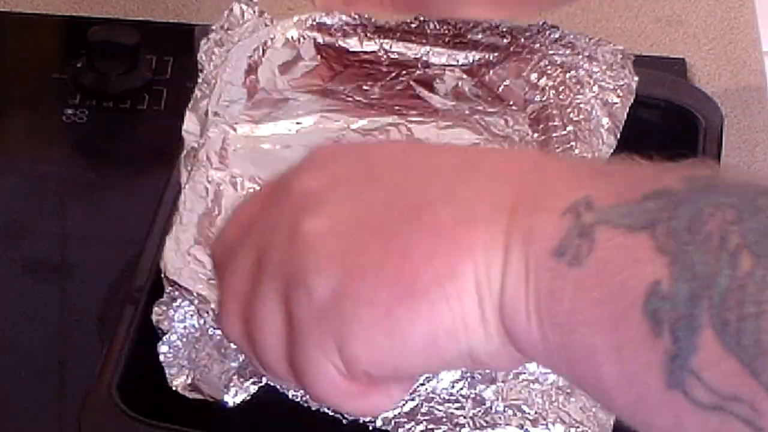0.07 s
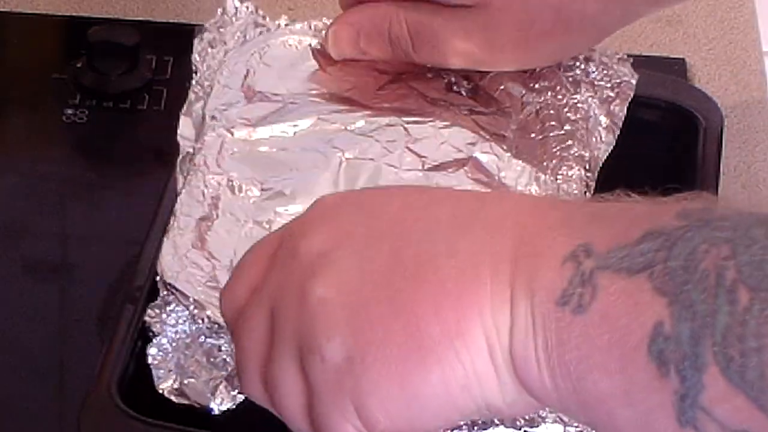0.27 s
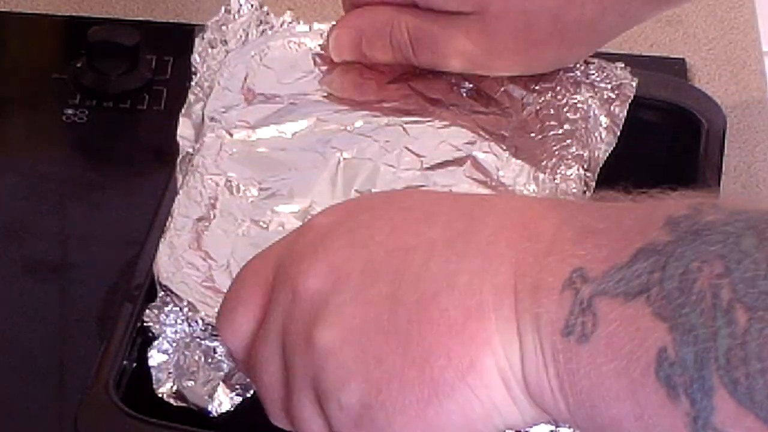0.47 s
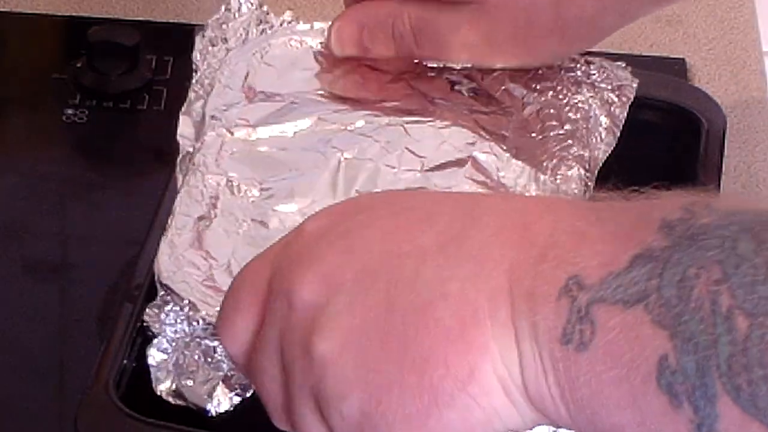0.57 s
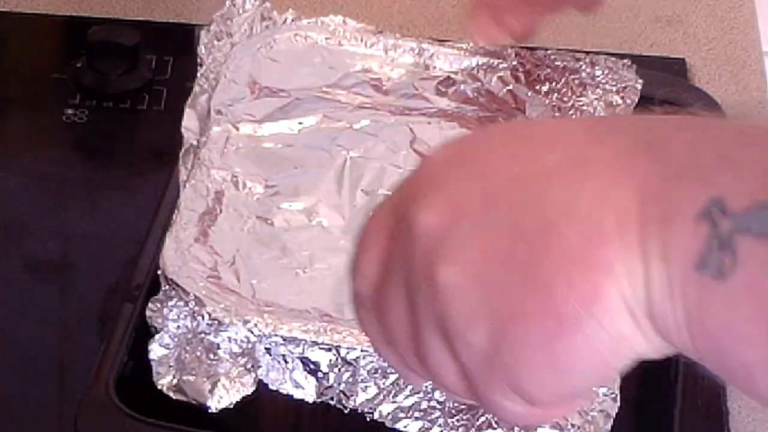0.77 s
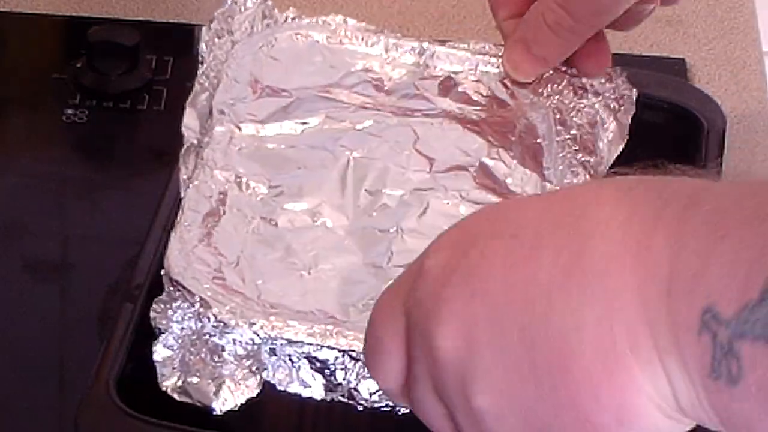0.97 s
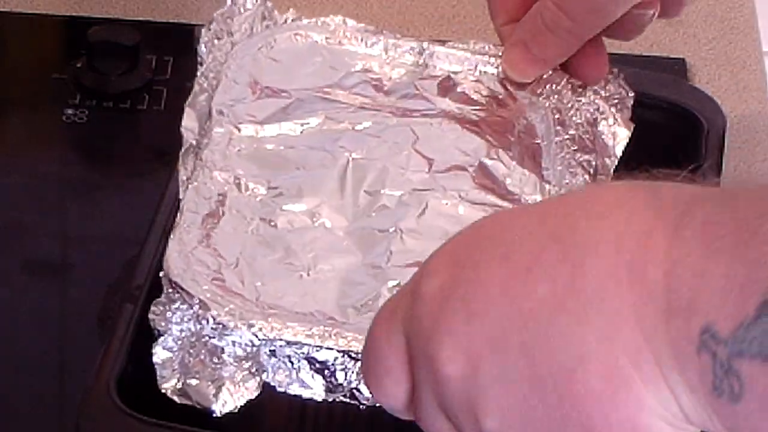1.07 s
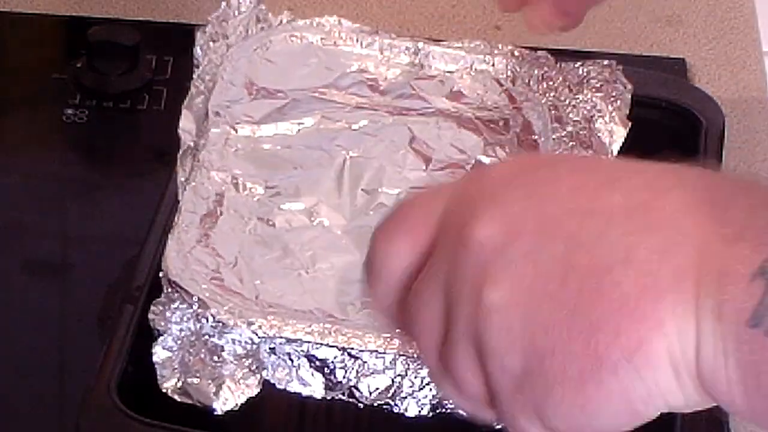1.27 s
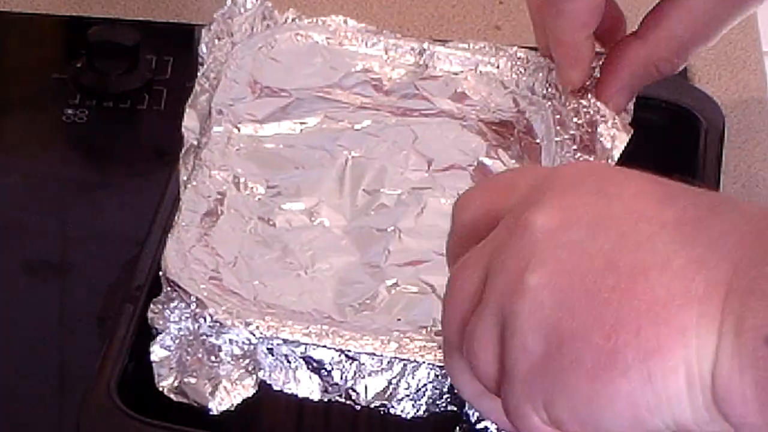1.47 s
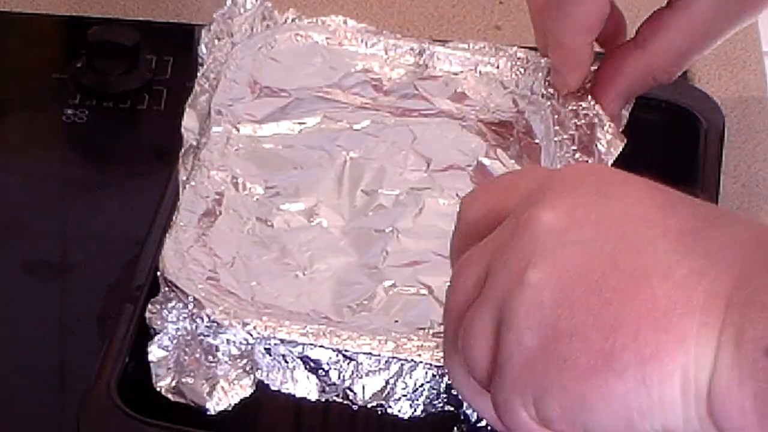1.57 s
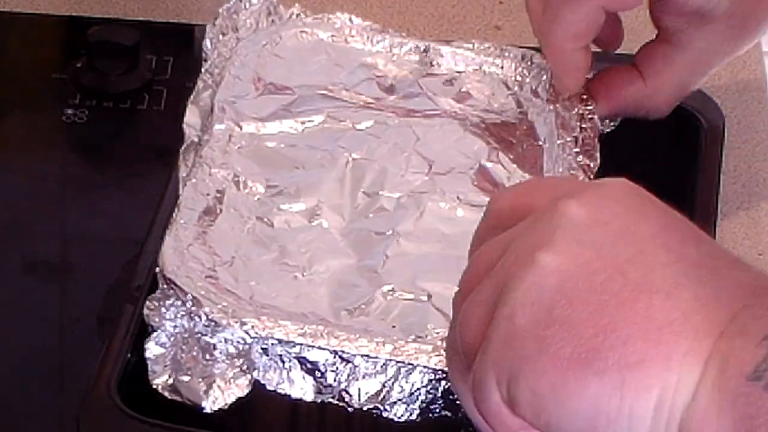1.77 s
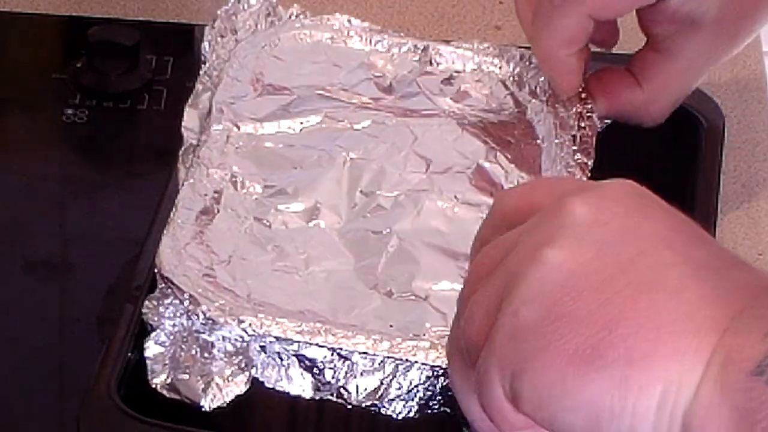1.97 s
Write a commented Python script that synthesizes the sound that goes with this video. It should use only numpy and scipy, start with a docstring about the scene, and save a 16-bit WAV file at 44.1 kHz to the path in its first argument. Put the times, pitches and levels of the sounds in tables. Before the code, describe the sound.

Bright, close crackling of aluminium foil comes in uneven bursts as hands mould it around a roasting tin, which knocks softly now and then. The sharpest crackle comes near the end, in a small, faintly humming kitchen.

```python
"""In a small kitchen with hard walls, hands press aluminium foil over a roasting tin.
Creases buckle in clusters of sharp clicks over a finer crackle, and firm presses knock the tin so
that it rings. The room echoes briefly over a low hum. A nearby microphone with a bright peak
picks it all up."""
import sys
import numpy as np
from scipy import signal
from scipy.fft import rfft, irfft, next_fast_len
from scipy.io import wavfile
from scipy.ndimage import map_coordinates

SR = 44100
rng = np.random.default_rng(int(sys.argv[2]) if len(sys.argv) > 2 else 0)


def pcm_store(signal):
    """Save signal as 16-bit PCM."""
    levels = np.round(np.clip(np.atleast_2d(signal), -1, 1) * 32767)
    wavfile.write(sys.argv[1], SR, levels.astype(np.int16).T)


N = 88993

# The tone of the kitchen's hum. Each row: frequency in Hz, relative level in dB.
HUM_TONE = [(20, -6.5), (60, -2), (100, 0.5), (175, -3), (268, 1.5), (365, 2), (450, -4), (520, 0.5),
            (900, -10), (1800, -17), (4800, -26.5), (9600, -38), (13500, -38), (15500, -40)]
# The room's echo. Each row: frequency in Hz, seconds to fade by 60 dB.
ROOM_FADE = [(500, .33), (2000, .32), (5500, .24), (10000, .22), (14000, .24)]
# The tin's own notes. Each row: pitch in Hz, relative level in dB, seconds to fade by 60 dB.
TIN_NOTES = [(390, -1.5, 0.068), (529.4, 0.5, 0.078), (686, 0, 0.046), (820, -1.5, 0.098),
             (1030, -8, 0.044), (1130, -3.5, 0.046), (1253, 0, 0.1), (1572, -7, 0.051), (2060, 0, 0.047),
             (2520, 2.5, .05)]
# Knocks on the tin. Each row: start in seconds, relative level in dB, pitch in Hz that is favoured.
TIN_KNOCKS = [(.004, -35.5, 1230), (.316, -36.5, 620), (.467, -42, 830), (.495, -42.5, 524),
              (.63, -43, 840), (.692, -30.5, 700), (.704, -35.5, 700), (.719, -45.5, 820), (.972, -37, 388),
              (1.099, -43, 1020), (1.284, -36.5, 665), (1.301, -33.5, 2400), (1.307, -38, 1210),
              (1.56, -37, 545), (1.924, -40, 1550)]
# A click's bright part, lower body and top treble. Each row: frequency in Hz, relative level in dB.
BRIGHT_TONE = [(1500, -47.5), (2500, -23.5), (4000, -15), (5500, -16), (7000, -8.5), (8500, -2), (9600, 1),
               (11000, -7.5), (13000, -21.5), (15600, -26)]
BODY_TONE = [(250, -30.5), (450, -3.5), (700, -3), (1300, -2), (2000, -5.5), (3000, -6), (5000, -5),
             (7000, -3.5), (10000, -52.5)]
TREBLE_TONE = [(8000, -35), (10500, 0), (12000, 3.5), (14000, -4.5), (15700, -19)]
# How the top treble comes and goes. Each row: time in seconds, level in dB against the bright part.
TREBLE_LEVELS = [(0, -13), (.25, -14), (.38, -9.5), (.5, -8.5), (.6, -25), (.76, -22), (.98, -6.5),
                 (1.14, -10), (1.3, -17), (1.55, -14), (1.8, -12), (2.02, -13)]
# How hard the hands press. Each row: time in seconds, relative crackle level in dB, body boost in dB.
HAND_PRESSURE = [(0.0, -67, 23.5), (0.12, -71, -4), (0.18, -81, 14), (0.25, -56.5, 8), (0.3, -62, -2),
                 (0.32, -56, 10), (0.36, -52, -2), (0.45, -45.5, -2.5), (0.47, -51, 0.5), (0.61, -60, -1.5),
                 (0.63, -50.5, -7), (0.68, -58, -4), (0.7, -53.5, 13), (0.77, -61, -7), (0.9, -88, -12),
                 (0.91, -64, -1), (0.97, -55.5, 1), (1.03, -51.5, 0.5), (1.16, -55, 4.5), (1.21, -67, 7.5),
                 (1.24, -57, -3), (1.3, -53.5, 12.5), (1.43, -77, 1), (1.57, -59.5, 13), (1.67, -63.5, -4),
                 (1.76, -52, -4.5), (1.81, -53, 3.5), (1.89, -47, -6), (1.94, -49, 5), (1.98, -52.5, -5),
                 (2.02, -54, -7)]
# Buckling creases. Each row: start in seconds, relative level in dB, body boost in dB,
# after-click boost in dB. A negative boost makes that part quieter.
CREASES = [(0.0004, -19.5, -16.5, -7), (0.0042, -19.5, -17, -14), (0.0094, -24, -12.5, -13),
           (0.0185, -30, -10.5, -7), (0.0326, -31, -21, -7.5), (0.1925, -47.5, -8, -1.5),
           (0.1982, -38.5, -15.5, -7), (0.208, -38, -11, -6), (0.2404, -36, -17, -2),
           (0.2483, -37, -10.5, -5.5), (0.269, -45, -8, -3.5), (0.279, -38, -10, -9), (0.289, -43, -8, -12),
           (0.3009, -37, -11, -6), (0.3115, -31.5, -15.5, -4), (0.3155, -34, -14, -4),
           (0.357, -31.5, -24, -6.5), (0.375, -26.5, -19.5, -12), (0.3846, -19.5, -24.5, -15),
           (0.428, -34, -17, -8), (0.4348, -33, -14, -5), (0.444, -26, -23, -3.5), (0.4661, -25.5, -20, 0),
           (0.4696, -23, -20, -10), (0.472, -25, -35, -0.5), (0.4757, -20.5, -29, -15),
           (0.4881, -19.5, -21, -13.5), (0.498, -27.5, -16.5, -7), (0.5057, -31, -21, -15),
           (0.5169, -35, -12, -5), (0.5336, -24, -18, -11.5), (0.5487, -30.5, -18, -4),
           (0.568, -23, -27, -8.5), (0.619, -26.5, -19.5, -7), (0.6322, -30, -12.5, -9),
           (0.6817, -28.5, -17, -2), (0.6879, -22.5, -8.5, -6.5), (0.6956, -29.5, -6, -5.5),
           (0.717, -22, -22, -12), (0.7467, -28.5, -30, -1), (0.7491, -23, -33, -3.5),
           (0.754, -21, -22, -6), (0.7613, -25, -27, -12), (0.7855, -39, -16, -8),
           (0.908, -48.5, -1.5, -2.5), (0.9147, -49, 0, -6), (0.9343, -38, -14.5, -2),
           (0.943, -34, -12, -7.5), (0.9614, -34, -18, -1), (0.9805, -27, -24, -9), (0.9889, -30, -31, -18),
           (1.005, -43, -23, -10), (1.03, -37, -25, -2.5), (1.036, -33.5, -22, -7),
           (1.0471, -39.5, -15, -8), (1.0797, -31.5, -19, -5.5), (1.139, -30.5, -25, -9),
           (1.251, -40.5, -10, -1), (1.261, -22.5, -20, -12), (1.271, -35.5, -7, -1.5),
           (1.2817, -24, -23, -8.5), (1.293, -30.5, -21, -0.5), (1.3013, -19, -17, -7),
           (1.3029, -19.5, -24, -12), (1.3085, -26, -7, -14.5), (1.315, -40, -13.5, -14),
           (1.487, -55, -2, -4), (1.4992, -43, -6, -4), (1.5099, -35, -15, -4.5), (1.5211, -35, -10, -8),
           (1.5286, -39, -14, -10), (1.548, -33, -20, -4), (1.5721, -35.5, -17, -2.5),
           (1.5871, -36, -21, -2), (1.5977, -28.5, -21, -5), (1.6364, -49, -13, -7), (1.684, -38, -11, -8),
           (1.6903, -39, -7.5, -10.5), (1.7047, -40, -13, -10), (1.7756, -40, -14, -8),
           (1.7858, -33, -17, -7), (1.7993, -35, -17, -4), (1.8073, -28, -23, -3.5), (1.82, -25, -30, -6),
           (1.8418, -25, -26, -7), (1.8566, -37, -17, -16), (1.8767, -37, -20, -5), (1.8942, -28, -24, -3),
           (1.9014, -24, -39, -5), (1.9166, -23.5, -31, 0.5), (1.923, -13, -27, -10.5),
           (1.9275, -24, -22, -9), (1.932, -22, -23, -11), (1.936, -27, -13, -11), (1.948, -27, -20, -3),
           (1.952, -32, -22, -3), (2.0021, -37.5, -12, -5)]

HUM_DB, ROOM_DB, KNOCK_DB = -57, -2.5, -6.5
CLICK_FADE_S, BODY_FADE_S = 0.0035, 0.0093  # time to fade by 60 dB
CRACKLES_PER_S, SCATTER_DB, CLUMP_DB = 4000, 4.5, 3.5
TOP_HZ = 15760


def amp(db):
    """Turn decibels into a factor to multiply by."""
    return 10 ** (np.asarray(db) / 20)


def value_at(table, hz):
    """Read between a table's rows, with frequency spaced by octaves."""
    row_hz, values = np.transpose(table)
    return np.interp(np.log(hz + 1), np.log(row_hz + 1), values)


def tone_filter(tone, size=4096):
    """Make a short filter with this tone and an energy of 1."""
    gain = amp(value_at(tone, np.fft.rfftfreq(size, 1 / SR)))
    cepstrum = irfft(np.log(gain + 1e-5), size)
    # folding it in half makes the filter ring only after a click, never before
    folded = np.r_[cepstrum[0], 2 * cepstrum[1:size // 2], np.zeros(size // 2)]
    response = irfft(np.exp(rfft(folded)), size)[:size // 2]
    return response / np.linalg.norm(response)


def filtered(sound, response):
    """Pass each row of sound through a filter."""
    return signal.fftconvolve(sound, response, axes=-1)[..., :N]


def kitchen_hum():
    """The kitchen's steady noise, strongest in the low notes."""
    noise = rng.standard_normal(N + 4096)
    hum = signal.fftconvolve(noise, tone_filter(HUM_TONE, size=8192), "valid")[:N]
    return amp(HUM_DB) * hum / np.sqrt(np.mean(hum ** 2))


def room_echo(spots, gap_s=0.003):
    """The walls give each spot its own echo; each frequency fades at its own speed."""
    noise = rng.standard_normal((len(spots), SR // 2))
    hz, t, spectrum = signal.stft(noise, SR, nperseg=256)
    fade = amp(-60 * t / value_at(ROOM_FADE, hz)[:, None])
    tail = signal.istft(spectrum * fade, SR, nperseg=256)[1]
    tail = np.pad(tail, ((0, 0), (round(gap_s * SR), 0)))
    return filtered(spots, tail / np.linalg.norm(tail, axis=1, keepdims=True)).sum(0)


def tin_knocks(spots=5, drop_db_per_octave=16.5, rise_s=0.00093):
    """Each knock rings all the tin's notes, favouring those near the pitch of the knocked area."""
    out = np.zeros((spots, N + SR))
    t = np.arange(SR // 4) / SR
    rise = 1 - np.exp(-t / rise_s)
    for k, (start, knock_db, favoured_hz) in enumerate(TIN_KNOCKS):
        ring = np.zeros(len(t))
        for hz, note_db, fade_s in TIN_NOTES:
            db = note_db - drop_db_per_octave * abs(np.log2(hz / favoured_hz)) + rng.normal(0, 2)
            ring += amp(db - 60 * t / fade_s) * np.sin(2 * np.pi * (hz * t + rng.random()))
        out[k % spots, round(start * SR):][:len(t)] += amp(knock_db + KNOCK_DB) * ring * rise
    return out[:, :N]


def flutter(times, sizes, fade_s, spots=6):
    """A crease flutters in a tiny burst of noise; each burst lands on a random spot of the foil."""
    t = np.arange(round(0.006 * SR)) / SR
    spot = rng.integers(0, spots, len(times))
    samples = np.round(times * SR).astype(int)[:, None] + np.arange(len(t))
    bursts = rng.standard_normal(samples.shape) * amp(-60 * t / fade_s)
    bursts = bursts / np.linalg.norm(bursts, axis=1, keepdims=True) * sizes[:, None]
    inside = samples < N
    slots = spot[:, None] * N + samples
    return np.bincount(slots[inside], bursts[inside], spots * N).reshape(spots, N)


def foil_clicks(times, level_db, body_db):
    """Each click has a bright part, a lower body that fades more slowly, and some top treble."""
    treble_db = np.interp(times, *np.transpose(TREBLE_LEVELS))
    parts = [(BRIGHT_TONE, 0, CLICK_FADE_S),
             (BODY_TONE, body_db, BODY_FADE_S),
             (TREBLE_TONE, treble_db, CLICK_FADE_S)]
    return sum(filtered(flutter(times, amp(level_db + db), fade_s), tone_filter(tone)[None])
               for tone, db, fade_s in parts)


def fine_crackle():
    """Thousands of small clicks come in clumps, louder as the hands press harder."""
    times = np.sort(rng.random(round(CRACKLES_PER_S * N / SR))) * N / SR
    clumps = map_coordinates(rng.standard_normal(200), [times * 70])  # 70 random levels a second
    scatter = np.clip(rng.standard_normal(len(times)), -2, 2)
    sizes = amp(SCATTER_DB * scatter + CLUMP_DB * clumps)
    sizes /= np.sqrt(np.sum(sizes ** 2) / N)
    press_s, press_db, body_db = np.transpose(HAND_PRESSURE)
    level_db = np.interp(times, press_s, press_db) + 20 * np.log10(sizes) - 1
    return foil_clicks(times, level_db, np.interp(times, press_s, body_db) - 3.5)


def buckling_creases(clicks=16, mean_delay_s=0.005, main_lift_db=7, after_lift_db=9):
    """Each crease gives way with one main click and a thinning swarm of after-clicks."""
    start, crease_db, body_db, after_db = np.array(CREASES).T[:, :, None]
    draws = -np.log(1 - rng.random((len(CREASES), 2 * clicks)))  # mostly small, 1 on average
    delays = mean_delay_s * draws[:, :clicks]
    drop_db = 3 * draws[:, clicks:]
    is_after = np.arange(clicks) > 0
    times = start + is_after * delays
    level_db = crease_db + np.where(is_after, after_db + after_lift_db - drop_db, main_lift_db)
    return foil_clicks(times.ravel(), level_db.ravel(), np.repeat(body_db, clicks) + 7)


def scene():
    """Add up the foil, the tin, their echo and the hum in one channel."""
    spots = np.vstack([buckling_creases() + fine_crackle(), tin_knocks()])
    return (spots.sum(0) + amp(ROOM_DB) * room_echo(spots) + kitchen_hum())[None]


def record(dry):
    """The microphone keeps nothing above its highest frequency."""
    size = next_fast_len(N + SR // 2)
    kept = np.fft.rfftfreq(size, 1 / SR) < TOP_HZ
    return irfft(rfft(dry, size) * kept, size)[:, :N]


dry = scene()
out = record(dry)
pcm_store(out)
```